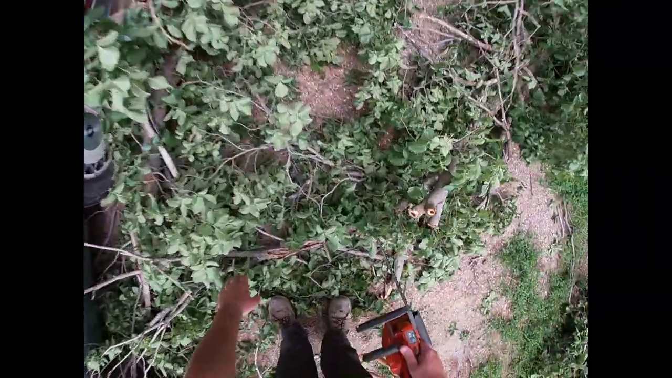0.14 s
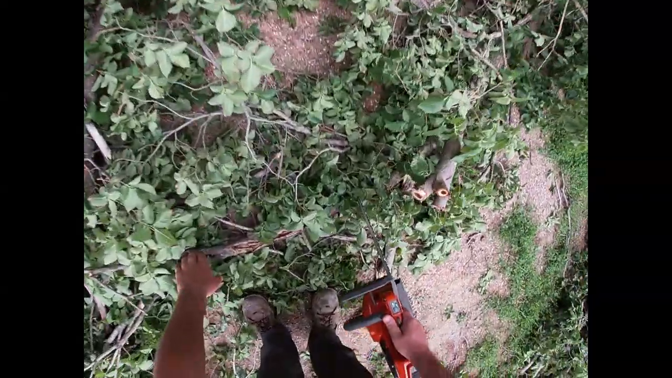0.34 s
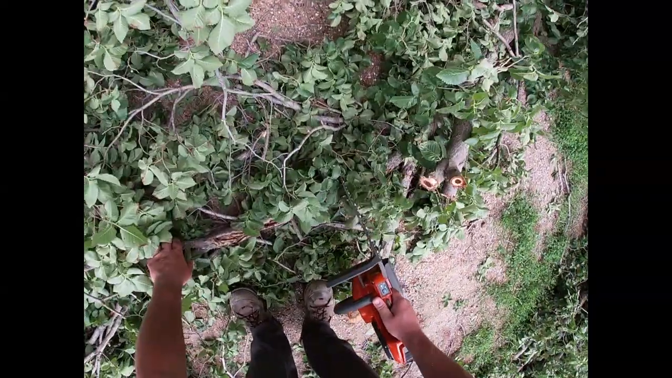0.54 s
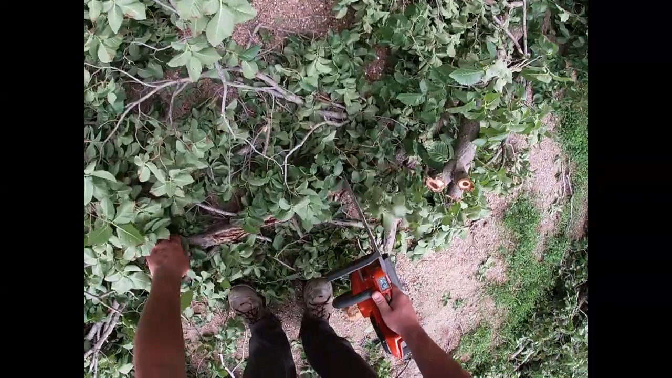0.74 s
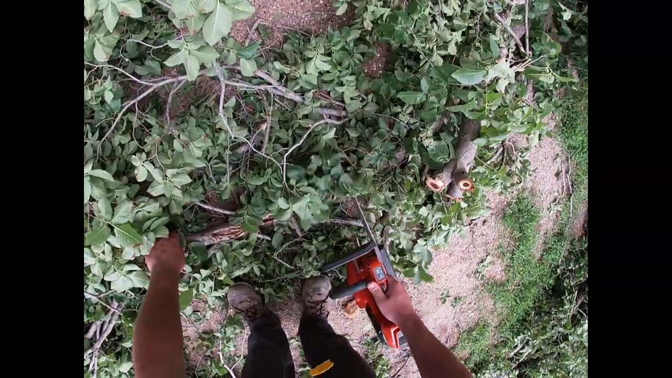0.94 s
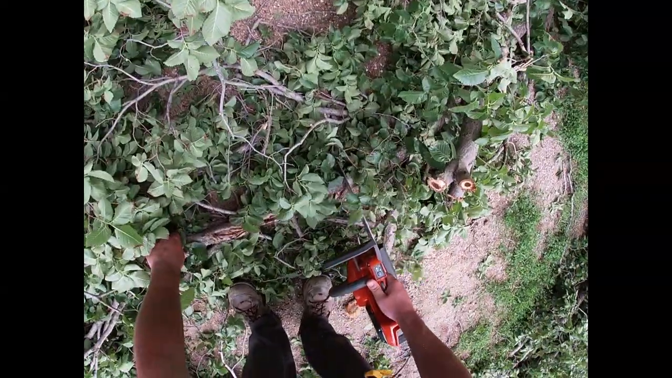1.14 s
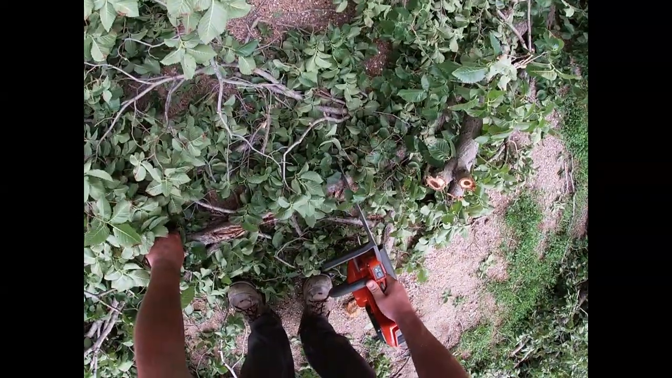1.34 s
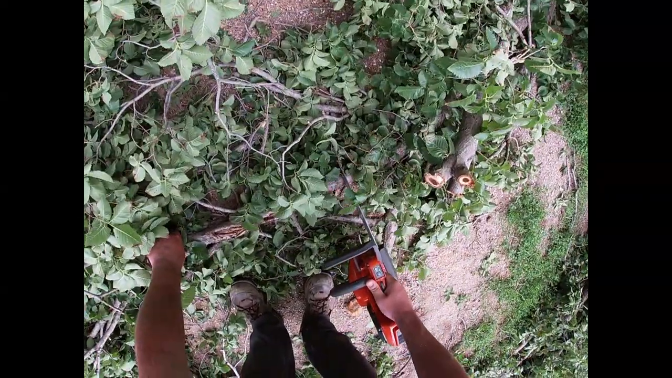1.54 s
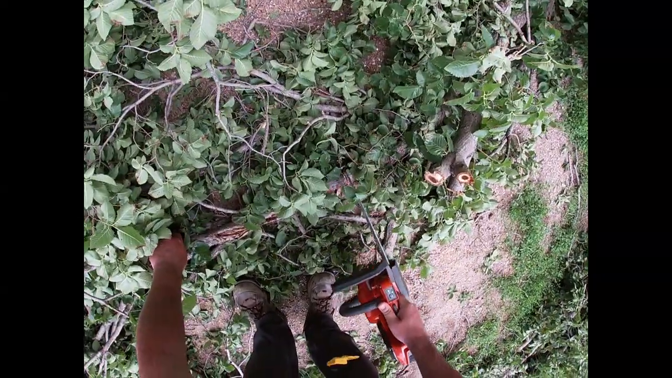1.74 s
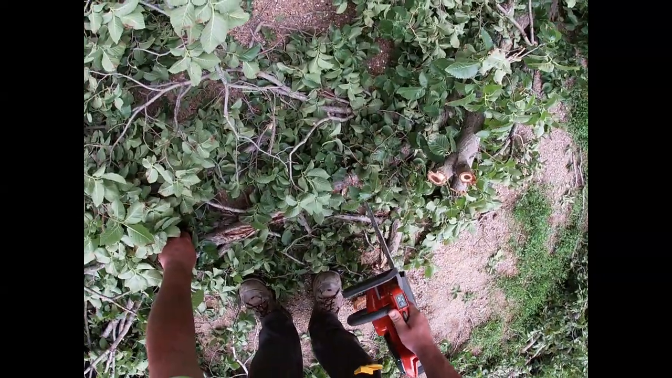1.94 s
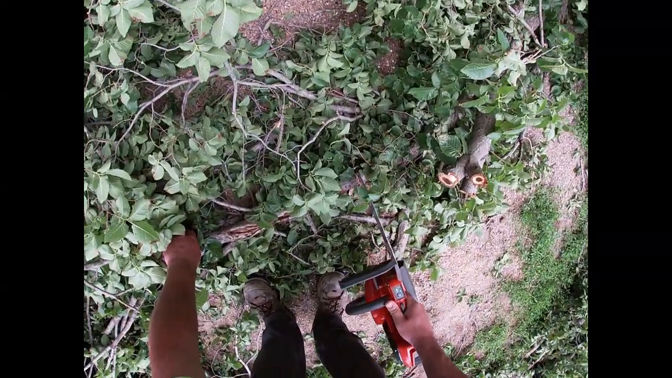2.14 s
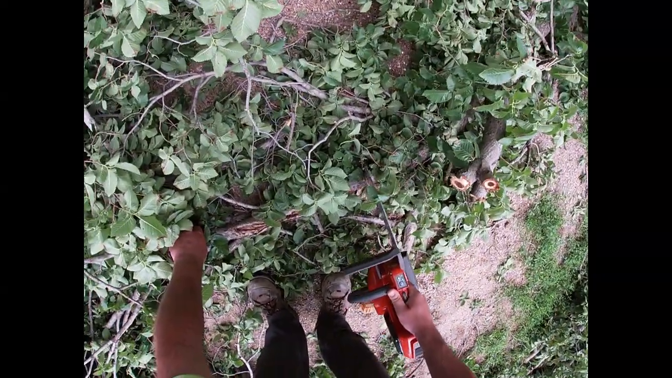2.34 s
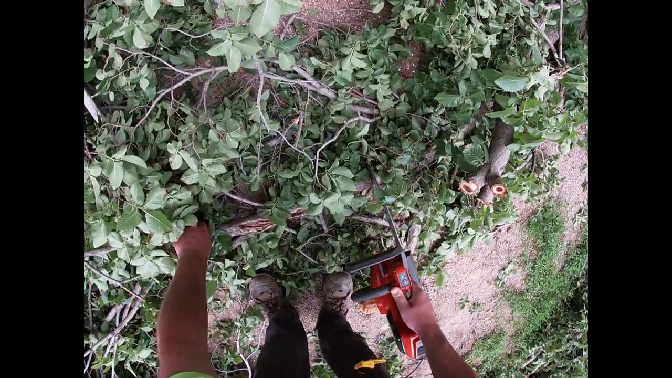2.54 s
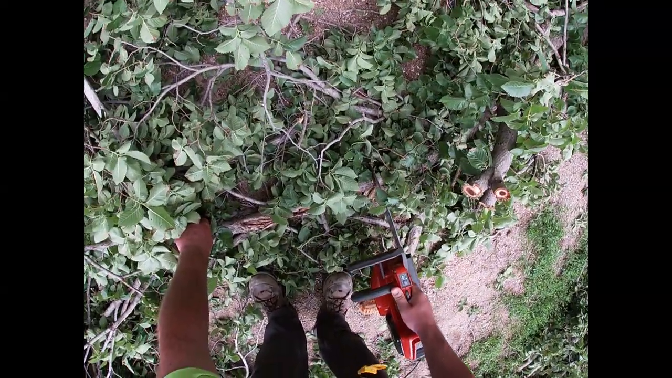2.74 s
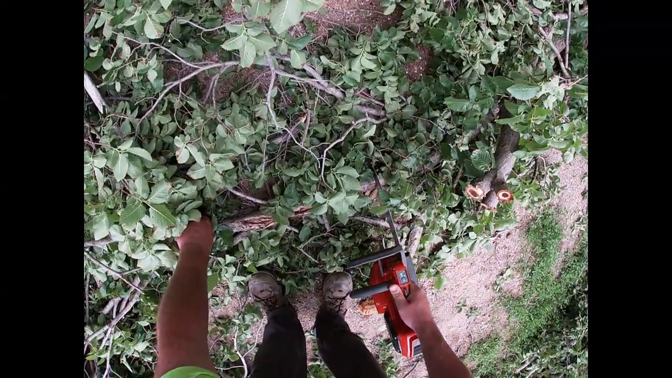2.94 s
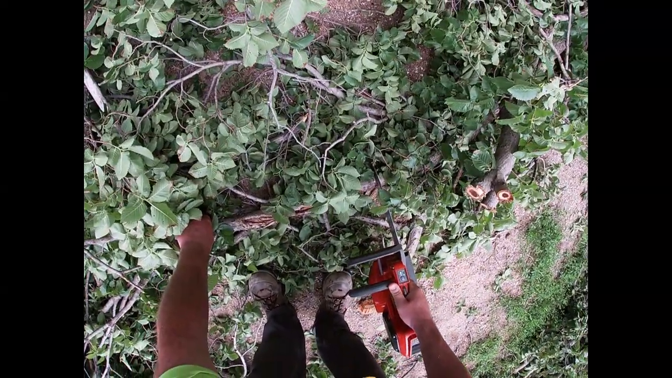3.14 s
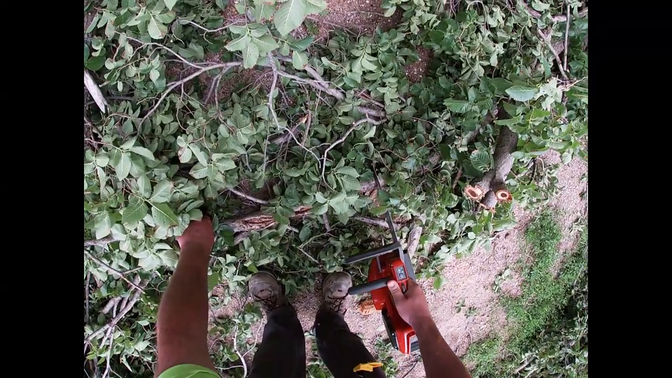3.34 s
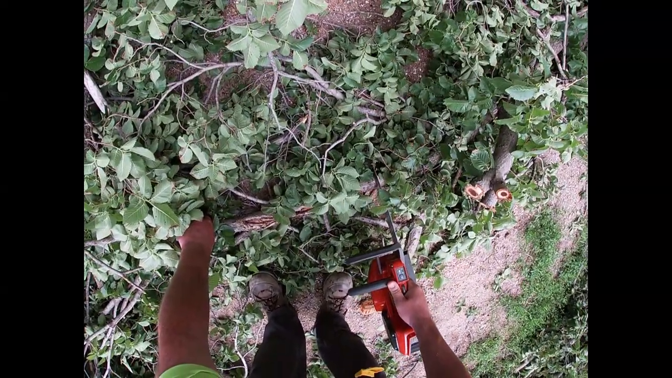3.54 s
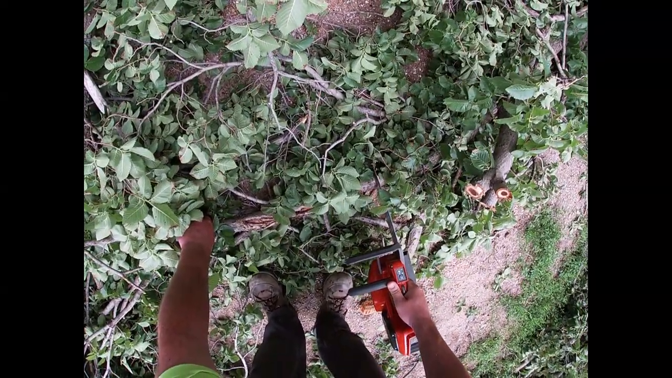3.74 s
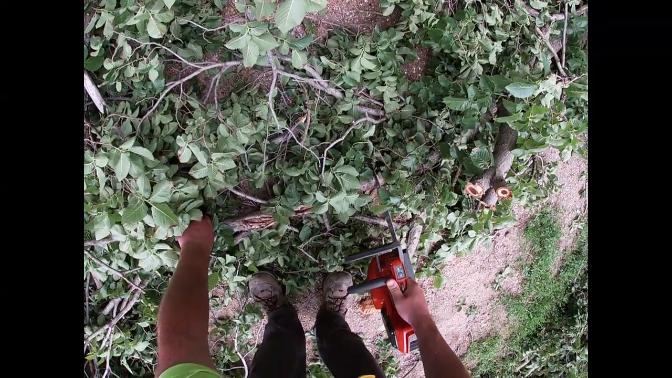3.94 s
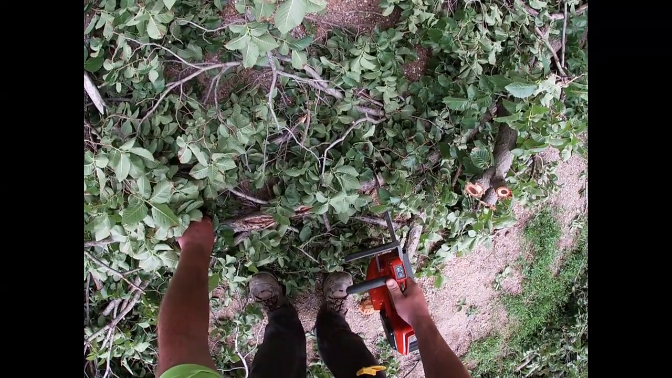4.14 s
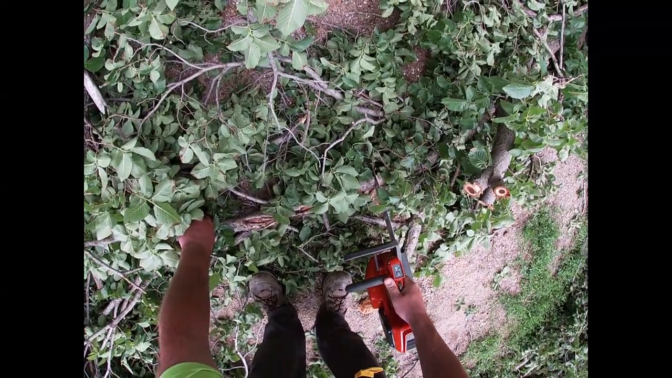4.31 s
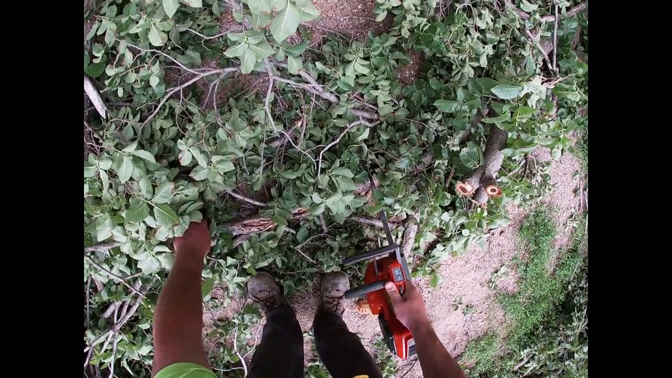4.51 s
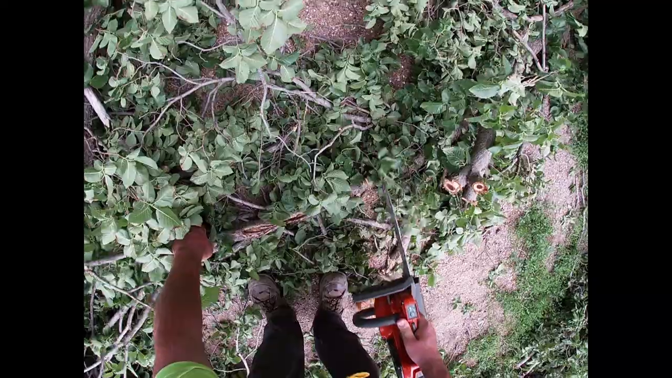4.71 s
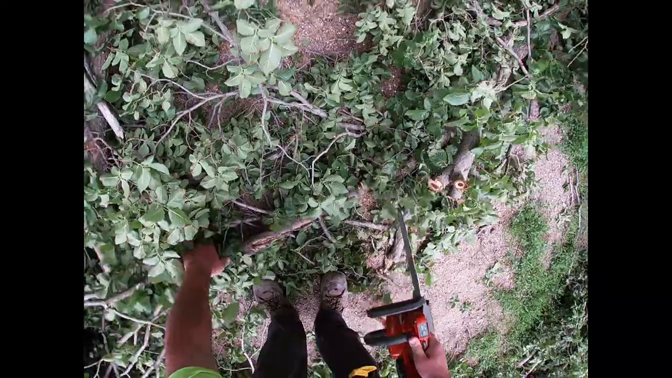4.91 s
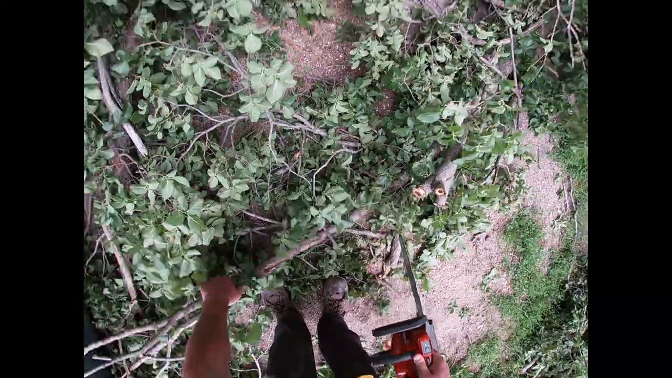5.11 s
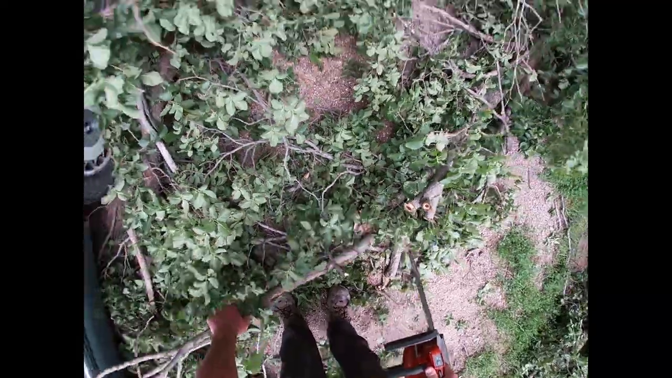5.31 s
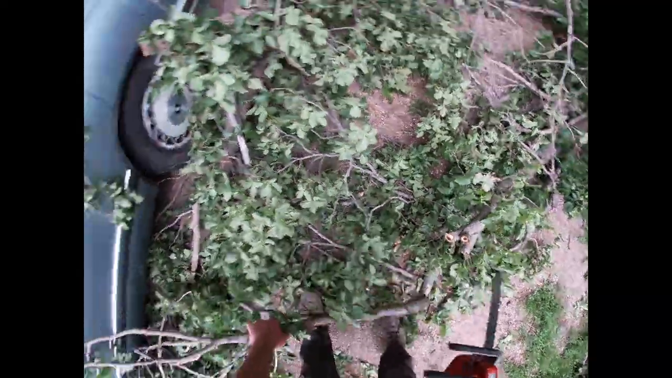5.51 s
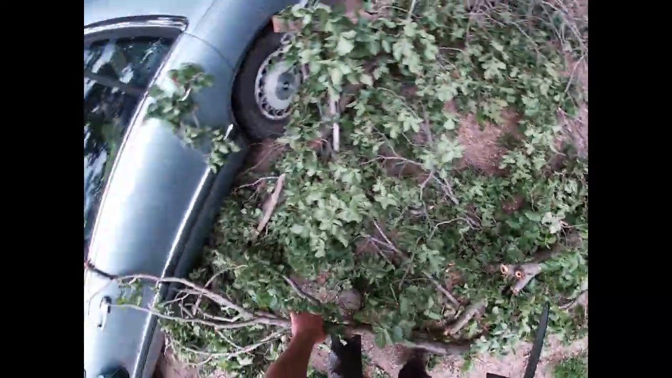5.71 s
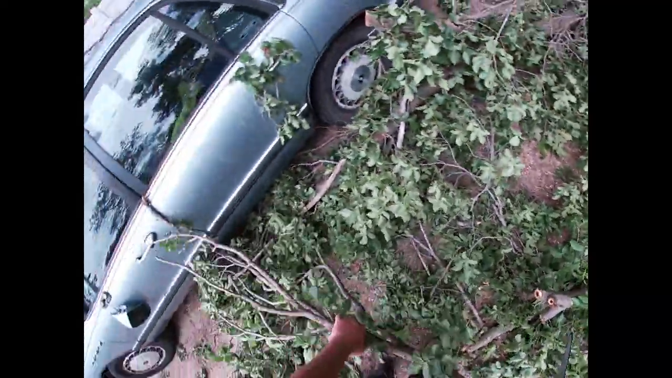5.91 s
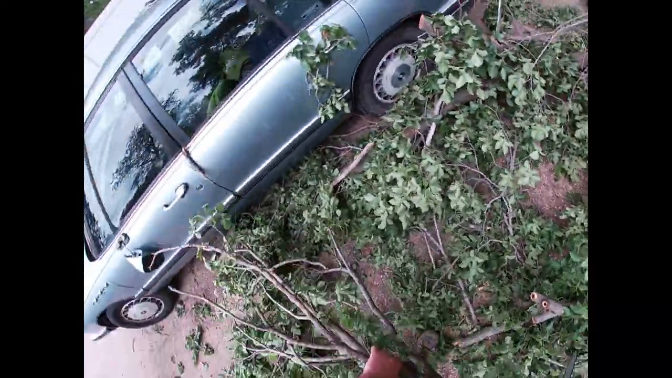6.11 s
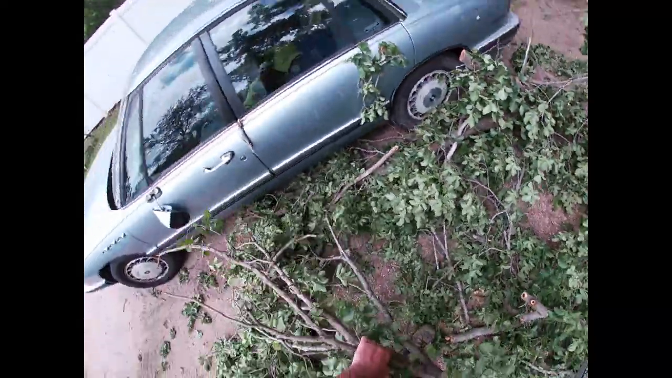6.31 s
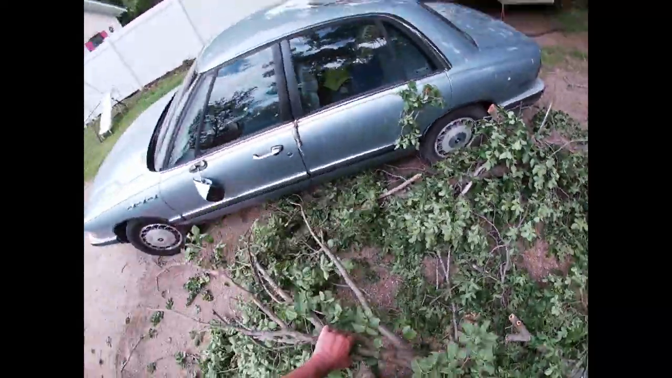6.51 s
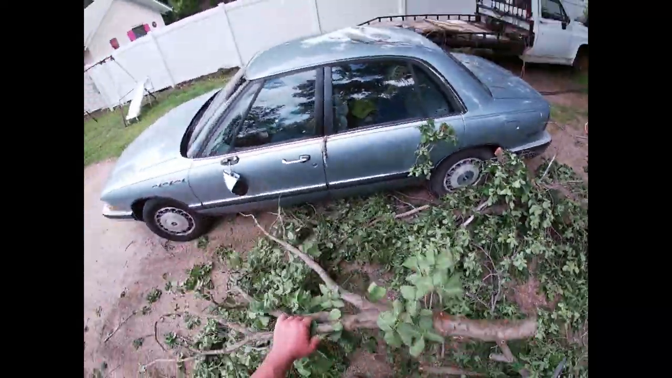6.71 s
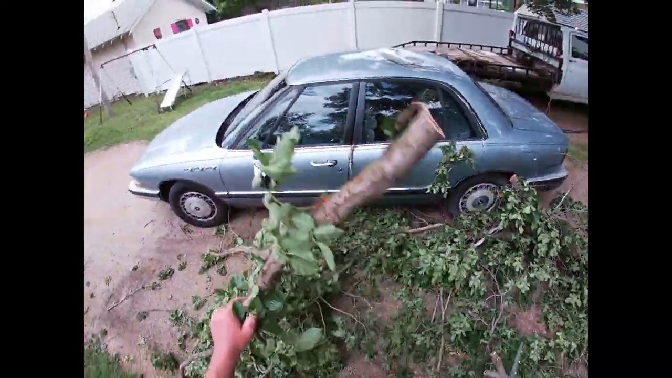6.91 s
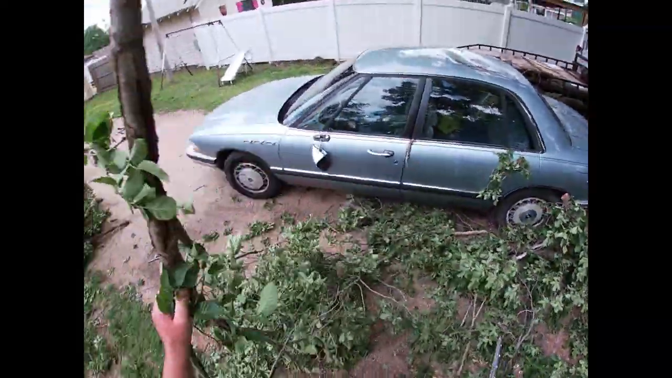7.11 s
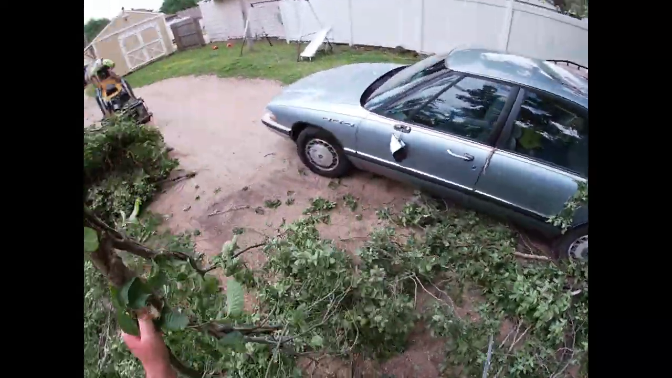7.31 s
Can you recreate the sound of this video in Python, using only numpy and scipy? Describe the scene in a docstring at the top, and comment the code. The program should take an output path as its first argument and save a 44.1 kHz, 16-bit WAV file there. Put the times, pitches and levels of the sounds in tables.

```python
"""Outdoors, an engine idles far off throughout. First the microphone is bumped, leaves brush and twigs knock.
Close by, a battery chainsaw held at arm's length over a heap of branches runs up, cuts and coasts, twice.
Links meshing with the six-tooth sprocket whine as tones that follow its speed; ticks coloured by the steel
bar and housing rattle and hiss; slack links ring the bar's modes, and under torque the tight bar sings.
At the end a branch is dragged out through leaves: dense crackle, filtered twig cracks and scraping slips."""
import sys
import numpy as np
from scipy import signal
from scipy.fft import rfft, irfft, next_fast_len
from scipy.io import wavfile
from scipy.ndimage import uniform_filter1d

SR = 44100
rng = np.random.default_rng(int(sys.argv[2]) if len(sys.argv) > 2 else 0)


def output_pcm(signal):
    """Save a mono or channel-first signal as 16-bit PCM at the path in sys.argv[1].

    Samples are clipped to [-1, 1] before scaling.
    """
    pcm = np.clip(np.atleast_2d(signal).T, -1, 1) * 32767
    wavfile.write(sys.argv[1], SR, np.round(pcm).astype(np.int16))


N = 324576
TIME = np.arange(N) / SR


def amp(db):
    """Decibels to gain."""
    return 10 ** (np.asarray(db) / 20)


def unit(x):
    """Scale to rms 1."""
    return x / np.sqrt(np.mean(x ** 2))


def peak(x, db):
    """Scale to a peak level."""
    return x * amp(db) / np.abs(x).max()


def place(s, x):
    """Put a short sound at its moment."""
    return np.pad(x, (max(int(s * SR), 0), N))[:N]


def swell(s, length):
    """A smooth bell-shaped rise and fall around a moment."""
    return np.exp(-np.minimum(((TIME - s) / length) ** 2 / 2, 20))


def ramp(s, length):
    """Rise from 0 to 1, starting at a moment."""
    return np.clip((TIME - s) / length, 0, 1)


def curves(table):
    """Each column of a time table, at every sample."""
    s, *columns = np.transpose(table)
    return [np.interp(TIME, s, c) for c in columns]


def walk(rate):
    """Smooth chance that changes about `rate` times a second; spread 1."""
    points = rng.standard_normal(N // 16)
    path = np.interp(TIME * rate, np.arange(len(points)), points)
    return unit(uniform_filter1d(path, max(int(SR / rate / 2), 1)))


def colour(x, points, resonances=()):
    """Causal filter from (Hz, dB) points, lifted by (Hz, width, dB) resonances."""
    size = next_fast_len(N + SR // 4, real=True) // 2 * 2
    hz = np.maximum(np.fft.rfftfreq(size, 1 / SR), 1)
    knots, db = np.transpose(points)
    db = np.interp(np.log(hz), np.log(knots), db)
    for centre, width, lift in resonances:
        db = db + lift / (1 + (2 * (hz - centre) / width) ** 2)
    # folding the cepstrum makes the filter minimum-phase
    cepstrum = irfft(np.log(amp(db)))
    cepstrum[1:size // 2] *= 2
    cepstrum[size // 2 + 1:] = 0
    return irfft(rfft(x, size) * np.exp(rfft(cepstrum)))[:N]


def ring(x, modes):
    """Drive (Hz, dB, t60) modes, each a decaying resonance."""
    out = 0
    for hz, db, t60 in modes:
        pole = np.exp((2j * np.pi * hz - np.log(1000) / t60) / SR)
        out = out + amp(db) * signal.lfilter([1], [1, -pole], x).imag
    return out


def grains(rate, spread_db):
    """Random clicks of uneven size, `rate` a second, with unit power."""
    chance = np.clip(rate / SR, 1e-5, 1)
    size = amp(spread_db * np.clip(rng.standard_normal(N), -2, 2)) * rng.choice([-1, 1], N)
    return unit((rng.random(N) < chance) * size / np.sqrt(chance))


def burst(t60, size=8192):
    """A sharp crack of noise that dies away."""
    return rng.standard_normal(size) * np.exp(-np.log(1000) * np.arange(size) / SR / t60)


def fade_db(hz, knee_hz, db_per_decade):
    """Level that holds above a knee speed and falls steadily below it."""
    return -db_per_decade * np.log10(1 + (knee_hz / hz) ** 4) / 4


# outdoor air at the microphone: (frequency [Hz], relative level [dB per Hz])
YARD_AIR_COLOUR = [(35, -22), (60, -5), (96, -22), (149, -20.5), (359, -12.5), (3840, -25), (4960, -23.5),
                   (7030, -32), (12900, -64), (15500, -102)]
# far idling engine: (frequency [Hz], base level [dB], added once the microphone turns toward it [dB])
IDLE_TONES = [(43.8, -41.5, 2.5), (127.8, -49.5, 0.5), (153.7, -44.5, -6), (312, -57, 7)]
# how plainly the far engine is heard: (time [s], added level [dB])
IDLE_HEARD_CURVE = [(0, 5.5), (.7, 5), (1.2, -4.5), (2.5, -1), (4.9, -13), (5.6, -1), (7.36, 1)]


def yard(air_db=-47):
    """Outdoor air as coloured noise, and a far engine as tones whose pitch and level waver."""
    out = unit(colour(rng.standard_normal(N), YARD_AIR_COLOUR)) * amp(air_db + walk(2.4))
    heard_db = curves(IDLE_HEARD_CURVE)[0]
    facing = np.interp(TIME, [6.2, 6.7], [0, 1])
    for hz, db, facing_db in IDLE_TONES:
        phase = 2 * np.pi * np.cumsum(hz * (1 + 0.00885 * walk(12))) / SR
        level_db = db + heard_db + facing * facing_db + 1.05 * walk(9.4)
        out += np.sqrt(2) * np.sin(phase) * amp(level_db)
    return out


# air and handling on the microphone: (time [s], bass level before air_db is added [dB])
RUMBLE_CURVE = [(0.31, -37.5), (0.39, -40), (0.8, -38.5), (1.68, -58), (2.35, -47.5), (2.96, -58),
                (4.98, -46.5), (6.42, -36.5), (6.49, -30), (6.65, -39), (7.02, -41.5), (7.18, -38),
                (7.36, -44)]
# tint of that rumble: (frequency [Hz], relative level [dB per Hz])
RUMBLE_TINT = [(15, -15), (35, 7), (70, -0.5), (130, -7), (200, -10.5), (300, -19.5), (600, -28.5),
               (2000, -73)]
# soft bumps on the microphone's housing, and at 0.817 s a low burst from the saw's shaft as it spins up: (time
# [s], level [dB], frequency [Hz], spread of the swell [s])
LOW_BUMPS = [(.04, -26, 50, .012), (.14, -22, 85, .012), (.188, -26, 55, .012), (.219, -9, 120, .004),
             (.242, -9, 66, .008), (.274, -22, 60, .01), (.817, -20, 160, .005)]


def handling(air_db=4):
    """Moving air shakes the microphone as bass noise; dull bumps are brief swells of a low tone."""
    out = unit(colour(rng.standard_normal(N), RUMBLE_TINT)) * amp(curves(RUMBLE_CURVE)[0] + air_db)
    for s, db, hz, length in LOW_BUMPS:
        out += amp(db) * np.sin(2 * np.pi * hz * (TIME - s)) * swell(s, length)
    return out


def rustle(table, edge_s=0.094):
    """Gain of one rustle, faded in and out around its level curve."""
    first_s, last_s = table[0][0], table[-1][0]
    return amp(curves(table)[0]) * ramp(first_s - edge_s, edge_s) * (1 - ramp(last_s, edge_s))


# leaves as the hand takes hold: (time [s], level before flicker [dB])
GRAB_RUSTLE = [(0.0, -43.5), (0.122, -41.5), (0.132, -55), (0.2, -52)]
# leaves as the branch is dragged out: (time [s], level before haul_db and flicker [dB])
HAUL_RUSTLE = [(5.45, -47), (5.628, -50), (5.88, -45), (6.02, -34.5), (6.1, -39), (6.15, -43.5),
               (6.24, -44.5), (6.38, -50)]
# leaves as the branch is lifted: (time [s], level before lift_db and flicker [dB])
LIFT_RUSTLE = [(6.46, -46.5), (6.614, -41), (6.626, -44.5), (6.682, -41), (6.922, -44), (7.094, -39),
               (7.136, -43.5), (7.36, -44)]
# tint of the brushing leaves: (frequency [Hz], relative level [dB per Hz])
LEAF_TINT = [(250, -38), (600, -4), (1200, -7), (2000, -5.5), (3200, 0.5), (5200, 2), (7000, -4),
             (9000, -17.5), (12000, -30.5), (15500, -37)]


def leaves(haul_db=2, lift_db=1, flicker_db=1.5):
    """Leaves brush in a dense crackle of uneven clicks and noise."""
    crackle = grains(1700, spread_db=4.2) + rng.standard_normal(N)
    brushing = rustle(GRAB_RUSTLE) + amp(haul_db) * rustle(HAUL_RUSTLE) + amp(lift_db) * rustle(LIFT_RUSTLE)
    return unit(colour(crackle, LEAF_TINT)) * brushing * amp(flicker_db * walk(45))


def soften(x):
    """Round off the top of the wood sounds above 6500 Hz."""
    return signal.sosfilt(signal.butter(4, 6500, fs=SR, output="sos"), x)


# twigs snap and knock: (time [s], peak level [dB], t60 [s], pitch of the wood [Hz])
TWIG_SNAPS = [(0.054, -26, 0.073, 1180), (0.072, -27, 0.11, 1700), (0.112, -23, 0.1, 1260),
              (.433, -33, 0.014, 8000), (5.572, -22, 0.032, 7040), (5.6, -28, .02, 1590),
              (5.641, -29, .02, 1600), (5.648, -22, 0.045, 1300), (5.697, -33, .01, 3760),
              (5.864, -25.5, 0.022, 700), (5.876, -13, 0.04, 4460), (5.9435, -17.5, 0.025, 3600),
              (5.974, -24, .02, 2500), (6.016, -20.5, .02, 2000), (6.02, -23, 0.025, 2800),
              (6.026, -24, .015, 2200), (6.053, -23, 0.018, 1500), (6.082, -32, .015, 1500),
              (6.222, -40, 0.013, 1000), (6.252, -33, .02, 1390), (6.395, -28.5, 0.017, 1210),
              (6.457, -31, .02, 760), (6.609, -23, 0.017, 2580), (6.643, -24, 0.024, 1100),
              (6.808, -26, 0.016, 4000)]


def twigs():
    """Fibres part in a sharp noise burst and splinter on in a longer one, tuned by the wood."""
    out = np.zeros(N)
    for s, db, t60, hz in TWIG_SNAPS:
        fracture = burst(t60) + 2 * burst(t60 / 5)
        wood = signal.lfilter(*signal.iirpeak(min(hz, SR / 4), 1.2, fs=SR), fracture)
        out += place(s, peak(soften(wood), db))
    return out


# pulls of the trigger: (pressed [s], released [s], first run-up [Hz per s], rise of the torque [s],
# extra clatter of the snatched slack [dB], whine [dB], octave of the link tone [dB])
TRIGGER_PULLS = [(.63, 1.648, 1458, 0.061, 8, -28, -6), (2.207, 4.523, 2375, 0.11, 3.5, -30, 1.5)]
# run-up, in links passing the sprocket: first kick, growth of the acceleration
KICK_HZ, RAMP_HZ_PER_S2 = 50.03, 3800
# governed speed; the stiff chain runs a little under it until it has loosened
FULL_HZ, STIFF_HZ, LOOSEN_S = 1030, 40, .4
# coasting: dry friction, and the speed at which drag equals it
FRICTION_HZ_PER_S, DRAG_HZ = 485.6, 463.4


def motor():
    """Each pull speeds the chain up until the governor holds it; released, it coasts against friction and drag.
    Gives the link rate (Hz) and the torque (0-1)."""
    link_hz, torque = np.ones(N), np.zeros(N)
    since_first = np.maximum(TIME - TRIGGER_PULLS[0][0], 0)
    governed = FULL_HZ - STIFF_HZ * np.exp(-since_first / LOOSEN_S)
    for pressed, released, hz_per_s, rise_s, *_ in TRIGGER_PULLS:
        since = np.maximum(TIME - pressed, 0)
        from_hz = max(np.interp(pressed, TIME, link_hz), KICK_HZ)
        free = from_hz + hz_per_s * since + RAMP_HZ_PER_S2 * since ** 2 / 2
        driven = free / (1 + (free / governed) ** 40) ** (1 / 40)
        # constant friction plus drag growing with speed squared slows the chain along a tangent curve
        coasted = np.maximum(TIME - released, 0)
        angle = np.arctan(np.interp(released, TIME, driven) / DRAG_HZ) - coasted * FRICTION_HZ_PER_S / DRAG_HZ
        coasting = np.maximum(DRAG_HZ * np.tan(np.maximum(angle, 0)), 1)
        link_hz = np.where(TIME < pressed, link_hz, np.where(TIME < released, driven, coasting))
        torque = torque + ramp(pressed, rise_s) / (1 + (free / governed) ** 8)
    return link_hz, torque


# the drive takes up the chain: (time [s], peak before the jolts are scaled together [dB], t60 [s])
DRIVE_JOLTS = [(.6275, -15, .04), (.6355, -6, .022), (.648, -20, .06), (.693, -12, .05), (.749, -13, .025)]


def start(lurch_from_hz=270, lurch_to_hz=545, lurch_db=-26):
    """The motor kicks in with a rough, rising lurch and snatches the chain tight."""
    # (Hz, dB)
    knock = [(200, -23), (700, 6), (1300, 6), (3200, 6.5), (4500, 1), (6000, 0.5), (9000, -15), (15000, -39)]
    jolts = colour(sum(place(s, peak(burst(t60), db)) for s, db, t60 in DRIVE_JOLTS), knock)
    clunk = ring(burst(t60=.07), [(530, 1, 0.049), (700, -2, .015), (980, 6, .011)])
    thud = place(.645, peak(clunk, db=-17))
    hz = lurch_from_hz + (lurch_to_hz - lurch_from_hz) * ramp(.653, .015)
    rough_phase = 2 * np.pi * np.cumsum(hz * (1 + .08 * walk(200))) / SR
    lurch = np.sin(rough_phase) * swell(.669, .008)
    return peak(jolts, db=-3.5) + thud + np.sqrt(2) * amp(lurch_db) * lurch


# the bar, singing while torque pulls the chain tight: (frequency [Hz], relative gain [dB], t60 [s])
TIGHT_BAR_MODES = [(2020, -3, 0.12), (2290, 4, .03), (2760, -16, .06)]
SING_DB, SING_KNEE_HZ = -26.5, 230  # level at full torque, and the speed below which it fades


def sing(link_hz, torque):
    """Under torque the tight chain rubs the bar into a bright ring."""
    rubbing = ring(grains(4 * link_hz, spread_db=3.5), TIGHT_BAR_MODES)
    return unit(rubbing) * torque * amp(SING_DB + fade_db(link_hz, SING_KNEE_HZ, 30))


# sprocket tones: (multiple of the shaft rate, relative level [dB], roughness [0-1],
# extra while speeding up [dB], extra while coasting [dB])
SPROCKET_TONES = [(1, -22, .3, 13, 0), (1.475, -22, .4, 11, 0), (2.85, -28, .3, 20, 0),
                  (3.07, -19, .6, 3, 0), (6, -.7, .1, 1.5, 0), (7, -13, .25, 6, -2),
                  (9.07, -8.5, .35, -3, -5), (12, -.5, .25, -2, 5), (14, -16, .4, 12, 0),
                  (14.93, -10.5, .3, 10, 3), (17, -14, .5, 4, 0), (18, -1.3, .17, -2.5, -5),
                  (19, -11, .3, 1, -1), (21.1, -19, .4, 14, 4), (24, -6.5, .3, -4, -2), (30, -17, .5, 0, 1)]
# how the sprocket cover radiates the whine: (frequency [Hz], gain [dB])
COVER_TINT = [(100, -4.5), (220, -1.5), (400, -1), (620, -1.5), (1030, 1.5), (3000, -1), (4200, 2)]
# the cover's peaks and notches, which the whine sweeps through: (frequency [Hz], width [Hz], lift [dB])
COVER_RESONANCES = [(700, 140, 7), (834, 40, -5), (448, 82, -5), (335, 83, 6.5), (230, 75, 2.5),
                    (2005, 85, 0.5)]
TEETH = 6
WHINE_DB_PER_DECADE = 40  # growth with speed
WHINE_TORQUE_HZ = 90  # torque seats the links as hard as this much more speed


def whine(turns, link_hz, torque, level_db, octave_db):
    """Tones of the shaft and the meshing links; uneven links roughen each one, torque shifts their balance."""
    accel = uniform_filter1d(np.gradient(link_hz) * SR, SR // 12)
    coasting = np.clip(-accel / 900, 0, 1)
    # overtones fade as the coasting links seat more gently
    firm = np.maximum(np.clip(link_hz / 900, 0, 1) ** 2, .7 * torque)
    out = 0
    for multiple, db, rough, driving_db, coasting_db in SPROCKET_TONES:
        phase = 2 * np.pi * multiple * turns
        steady = np.sqrt(2 - 2 * rough ** 2) * np.sin(phase)
        flutter = walk(75) * np.sin(phase) + walk(75) * np.cos(phase)
        weight = 1 if multiple == TEETH else firm
        if multiple == 2 * TEETH:
            weight = weight * amp(octave_db)
        tone_db = db + torque * driving_db + coasting * coasting_db
        out = out + amp(tone_db) * weight * (steady + rough * flutter)
    seating_db = WHINE_DB_PER_DECADE * np.log10((link_hz + WHINE_TORQUE_HZ * torque) / FULL_HZ)
    return colour(out * amp(level_db + seating_db + 0.64 * walk(12)), COVER_TINT, COVER_RESONANCES)


LOOP_LINKS = 52


def loop_ticks(turns, count=520):
    """Each rivet and cutter ticks with its own spacing and sign, and does so again on every lap of the chain."""
    laps = turns * TEETH / LOOP_LINKS
    spot = (np.arange(count) + rng.random(count)) / count
    sign = rng.choice([-1., 1.], count)
    lap = np.arange(int(laps[-1]) + 1)[:, None]
    at = np.interp(lap + spot, laps, np.arange(N), right=N).ravel()
    size = np.tile(sign, len(lap))
    # share each tick between the two samples around it
    sample, fraction = at.astype(int), at % 1
    ticks = np.bincount(sample, size * (1 - fraction), N + 2)
    ticks = ticks + np.bincount(sample + 1, size * fraction, N + 2)
    return unit(ticks[:N] / np.sqrt(np.gradient(laps)))


def glance(x, lag_ms=1.389, sway=0.086, share=0.26):
    """A reflection off the saw's own body; its path shifts as the hand moves."""
    lag = lag_ms / 1000 * (1 + sway * walk(1))
    return x + share * np.interp(TIME - lag, TIME, x)


# rough bands of the churning chain: (multiple of the shaft rate, width [Hz], level relative to the rattle [dB])
CHURN_BANDS = [(3.072, 53, -27.5), (10.38, 130, -19.5), (14.11, 110, -15.5), (15.47, 70, -24.5),
               (17.9, 120, -14), (23.48, 140, -15.5), (28.84, 190, -18)]


def churn(turns):
    """Uneven links smear part of the meshing into narrow bands of noise that follow the shaft."""
    out = 0
    for multiple, width_hz, db in CHURN_BANDS:
        phase = 2 * np.pi * multiple * turns
        out = out + amp(db) * unit(walk(width_hz) * np.sin(phase) + walk(width_hz) * np.cos(phase))
    return out


# tint of the chain's noise: (frequency [Hz], relative level [dB per Hz])
CHAIN_TINT = [(60, -15.5), (200, -8), (400, -27.5), (650, -11.5), (1000, -0.5), (1500, -4.5), (2500, -1),
              (4000, -2.5), (6000, -2.5), (7500, -3.5), (8800, -11.5), (11500, -18), (14500, -26.5),
              (15800, -28)]
# resonances of bar and housing: (frequency [Hz], width [Hz], lift [dB])
HOUSING_RESONANCES = [(550, 59, 7), (700, 81, 3.5), (810, 43, -5.5), (1346, 54, 2.5), (1751, 204, 9.5),
                      (1976, 89, 4), (2060, 76, 6), (2387, 160, 6.5), (2800, 91, 3), (3290, 750, 5),
                      (3500, 290, 1.5), (4280, 180, 2), (4680, 300, 5), (5180, 160, 6), (5770, 690, 7),
                      (7060, 450, 2.5), (9930, 960, 5), (10600, 400, 0.5), (12800, 910, 5.5)]
# level, speed below which it fades and how steeply, changes under torque and in the wood
RATTLE_DB, RATTLE_KNEE_HZ, RATTLE_DB_PER_DECADE, RATTLE_TORQUE_DB, RATTLE_BITE_DB = -22.5, 570, 38, 0.44, -0.9
RATTLE_TORQUE_HZ = 280  # torque shakes the chain as hard as this much more speed
# hiss relative to the rattle: when slow, more at full speed, more in the wood
HISS_DB, HISS_SPEED_DB, HISS_BITE_DB = -2.5, 2, 3.5


def rattle(turns, link_hz, torque, bite, link_depth=0.33, shaft_depth=0.083, flicker_db=0.68):
    """Rivets and cutters tick and scrape along the bar, bunched at every link and every turn of the shaft."""
    rattle_db = RATTLE_DB + RATTLE_TORQUE_DB * torque + RATTLE_BITE_DB * bite
    rattle_db = rattle_db + fade_db(link_hz + RATTLE_TORQUE_HZ * torque, RATTLE_KNEE_HZ, RATTLE_DB_PER_DECADE)
    hiss_db = HISS_DB + HISS_SPEED_DB * (link_hz / FULL_HZ) ** 2 + HISS_BITE_DB * bite
    link_bunch = 1 + link_depth * np.cos(2 * np.pi * TEETH * turns)
    shaft_bunch = 1 + shaft_depth * np.cos(2 * np.pi * turns)
    # a slow chain repeats its ticks lap after lap; at full speed more of them fall by chance
    loose = np.minimum(.2 + .42 * (link_hz / FULL_HZ) ** 6 + .25 * bite, .95)
    chance_ticks = grains(8 * link_hz ** 2 / FULL_HZ + 300, spread_db=1.5)
    scrape = .24 * rng.standard_normal(N)
    ticks = np.sqrt(1 - loose) * loop_ticks(turns) + np.sqrt(loose) * chance_ticks + scrape
    body = glance(colour(ticks * link_bunch * shaft_bunch, CHAIN_TINT, HOUSING_RESONANCES))
    low = signal.sosfiltfilt(signal.butter(3, 3800, fs=SR, output="sos"), body)
    hiss = amp(hiss_db + flicker_db * walk(25.12)) * unit(body - low)
    return (unit(low) + hiss + churn(turns)) * amp(rattle_db)


# modes of the bar, rung by slack links: (frequency [Hz], relative gain [dB], t60 [s])
BAR_MODES = [(788, -9.5, 0.063), (994, 5, 0.014), (1057, 7.5, 0.016), (1780, -2, 0.021),
             (1954, 10.5, 0.024), (2140, 0, 0.023), (2730, -11, 0.045), (3380, -5, .01), (4180, 8, .008),
             (4650, 9, 0.0045), (5240, 7, .0061)]
# the coasting chain slaps the bar: (time [s], peak level [dB])
COASTING_SLAPS = [(1.89, -23), (2.007, -22), (5.005, -12), (5.039, -20), (5.059, -14), (5.110, -23),
                  (5.156, -18), (5.194, -25), (5.235, -29), (5.265, -28), (5.421, -28)]
# level, speed below which it fades and how steeply, change when taut at full speed
SLACK_DB, SLACK_KNEE_HZ, SLACK_DB_PER_DECADE, TAUT_DB = -34, 200, 17, -5
SLACK_STOP_HZ = 78.6  # below this speed the links slide and their steady slapping fades out
BAR_CUTOFF_HZ = 660  # the narrow bar radiates little below this


def clatter(turns, link_hz, snatch_db):
    """Slack links slap the bar and ring it, some harder than others; a fast, taut chain slaps less."""
    taut = (link_hz / FULL_HZ) ** 10
    slack_db = SLACK_DB + snatch_db + TAUT_DB * taut + fade_db(link_hz, SLACK_KNEE_HZ, SLACK_DB_PER_DECADE)
    moving = 1 / (1 + (SLACK_STOP_HZ / link_hz) ** 12)
    slaps = .7 * loop_ticks(turns, count=2 * LOOP_LINKS) + grains(.6 * link_hz + 120, spread_db=4)
    radiation = signal.butter(5, BAR_CUTOFF_HZ, "high", fs=SR, output="sos")
    out = unit(signal.sosfilt(radiation, ring(slaps, BAR_MODES))) * amp(slack_db) * moving
    steel = signal.butter(2, [1500, 7000], "band", fs=SR, output="sos")
    for s, db in COASTING_SLAPS:
        contact = burst(t60=.005)
        slap = unit(ring(contact, BAR_MODES)) + unit(signal.sosfilt(steel, contact))
        out += place(s, peak(slap, db))
    return out


# the cutters sink into wood: (start [s], through [s], depth if fully sunk in [0-1])
WOOD_CUTS = [(1.12, 1.574, 0.86), (2.7, 4.09, 0.7)]
BITE_S, FREE_S = 0.58, 0.067  # time to sink in fully, time to come free
WHINE_BITE_DB, OCTAVE_BITE_DB = -0.5, -4  # in the wood: all tones, octave of the link tone


def saw():
    """One shaft speed drives whine, rattle, clatter and singing; wood damps the chain and makes it hiss."""
    link_hz, torque = motor()
    link_hz = link_hz * (1 + .001 * walk(12) + .0006 * walk(2))
    turns = np.cumsum(link_hz) / SR / TEETH
    pulls = np.array(TRIGGER_PULLS)
    latest_pull = np.maximum(np.searchsorted(pulls[:, 0], TIME) - 1, 0)
    *_, snatch_db, whine_db, octave_db = pulls[latest_pull].T
    bite = sum(depth * ramp(s, BITE_S) * (1 - ramp(through, FREE_S)) for s, through, depth in WOOD_CUTS)
    tones = whine(turns, link_hz, torque, whine_db + WHINE_BITE_DB * bite, octave_db + OCTAVE_BITE_DB * bite)
    chain = rattle(turns, link_hz, torque, bite) + clatter(turns, link_hz, snatch_db * torque)
    return start() + sing(link_hz, torque) + tones + chain


# a branch drags over the heap: (time [s], spread of the swell [s], level [dB], pitch of the wood [Hz])
BRANCH_DRAGS = [(5.823, 0.0075, -40, 1400), (6.018, 0.0075, -36, 1500), (6.045, 0.027, -37, 637),
                (6.08, 0.025, -43, 1700), (6.227, 0.025, -43, 825), (6.468, 0.013, -45, 880)]


def drags():
    """A dragged branch slips in many small jerks, which sound the note of its wood."""
    slips = soften(grains(900, spread_db=1.5))
    out = np.zeros(N)
    for s, length, db, hz in BRANCH_DRAGS:
        wood = signal.lfilter(*signal.iirpeak(hz, 2.5, fs=SR), slips)
        out += unit(wood) * swell(s, length) * amp(db)
    return out


# width of the sound, open only in the top of the hiss: (frequency [Hz], side relative to mid [dB])
STEREO_WIDTH = [(2500, -83), (5000, -58.5), (9500, -57), (11000, -15), (12500, 2), (15500, -3)]


def scene():
    """All sources sit in the middle; only the highest hiss spreads to the sides."""
    mid = yard() + handling() + leaves() + twigs() + saw() + drags()
    side = colour(place(.004, mid), STEREO_WIDTH)  # 4 ms late
    return np.array([mid + side, mid - side])


TOP_HZ = 15600


def record(dry):
    """The recorder drops the deepest bass, rounds the loudest peaks and cuts the top."""
    dry = signal.sosfilt(signal.butter(3, 24, "high", fs=SR, output="sos"), dry)
    dry = .8 * np.tanh(dry / .8)
    return signal.sosfilt(signal.ellip(10, .2, 80, TOP_HZ, fs=SR, output="sos"), dry)


dry = scene()
out = record(dry)
output_pcm(out)
```